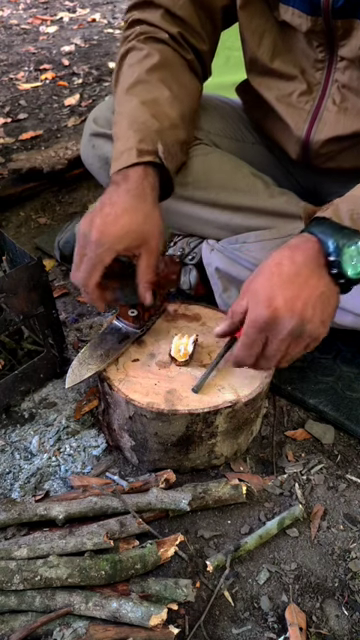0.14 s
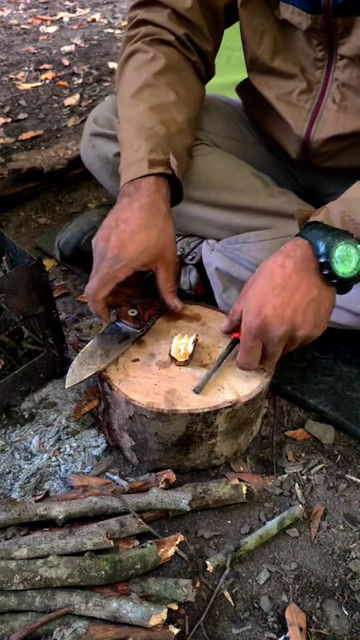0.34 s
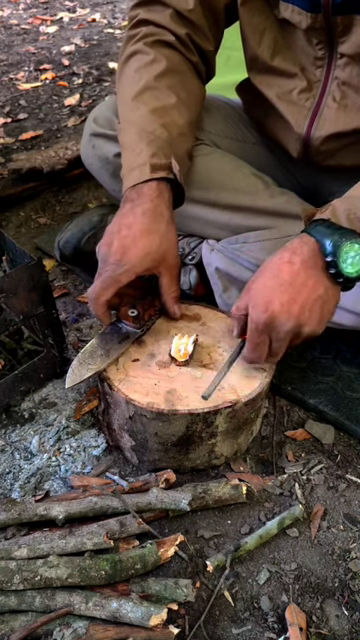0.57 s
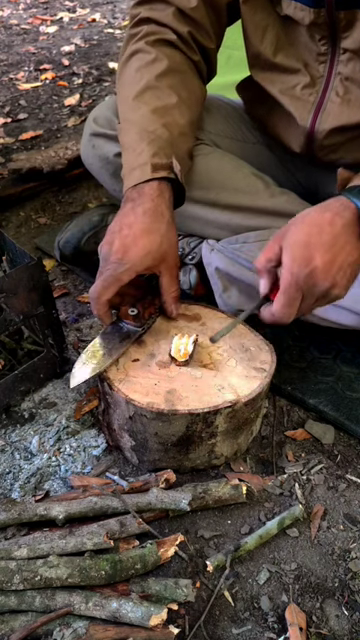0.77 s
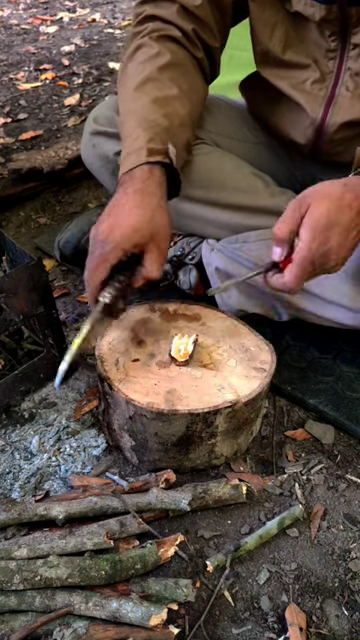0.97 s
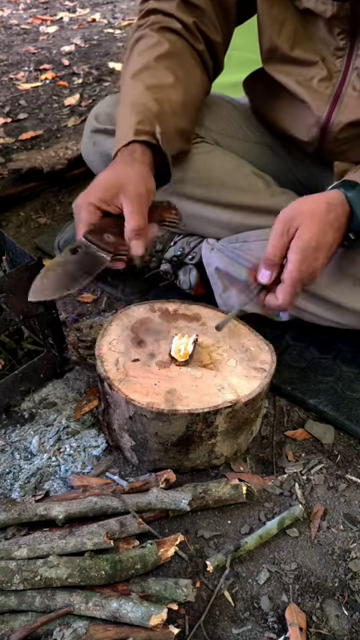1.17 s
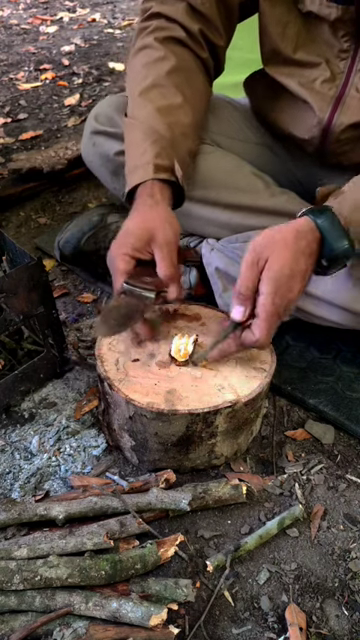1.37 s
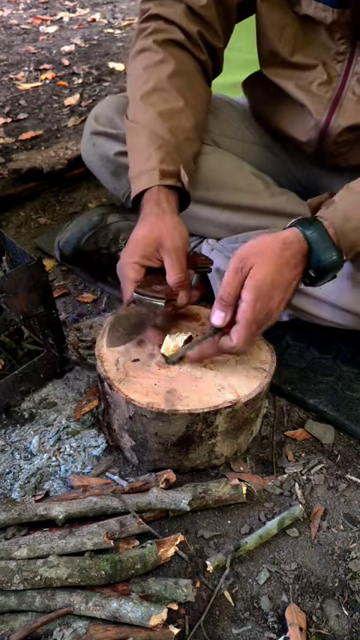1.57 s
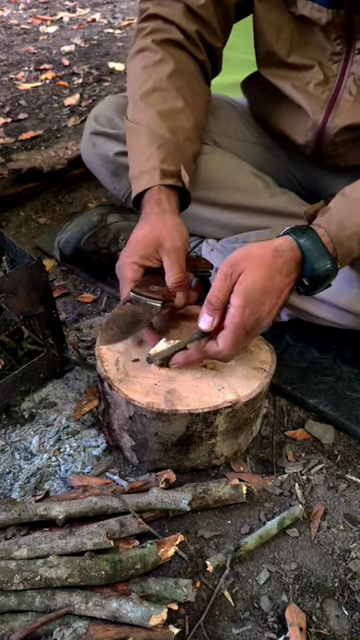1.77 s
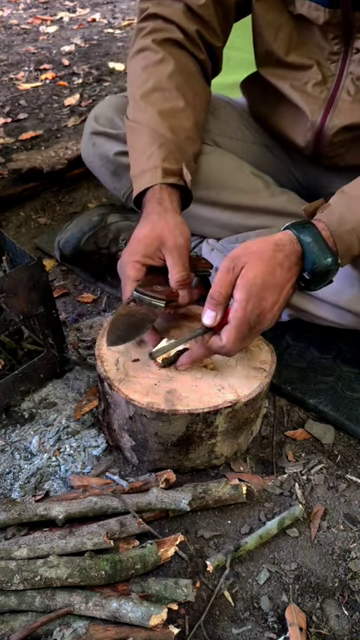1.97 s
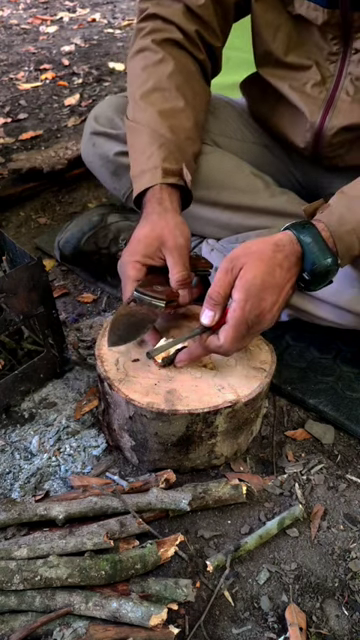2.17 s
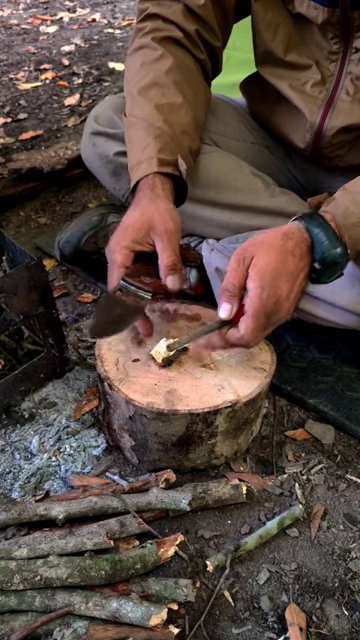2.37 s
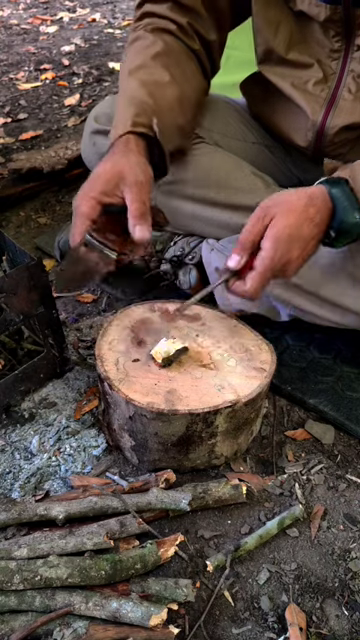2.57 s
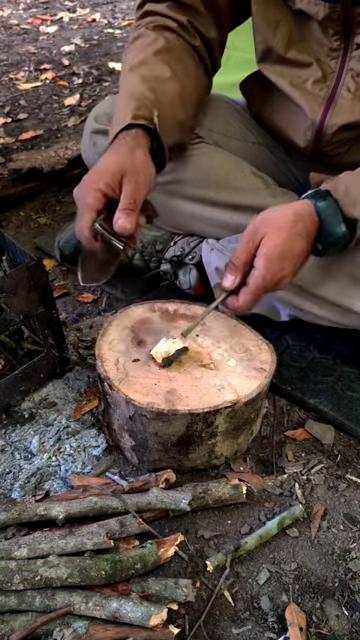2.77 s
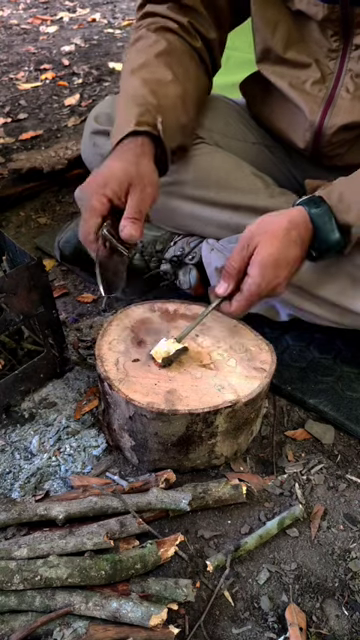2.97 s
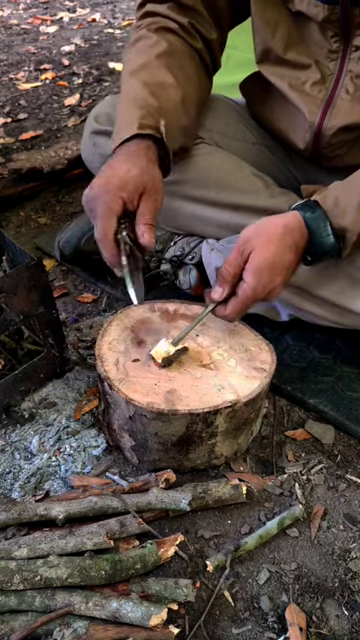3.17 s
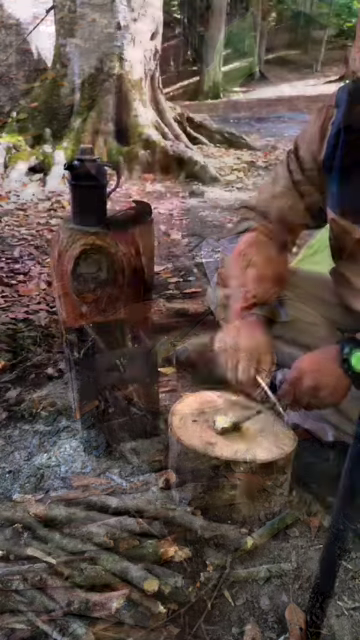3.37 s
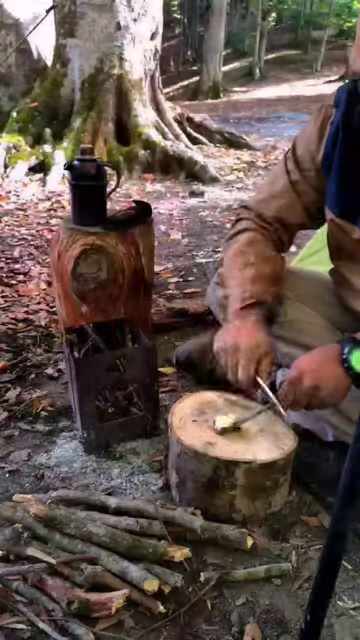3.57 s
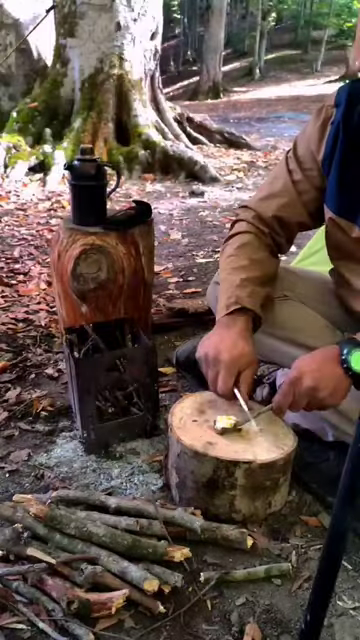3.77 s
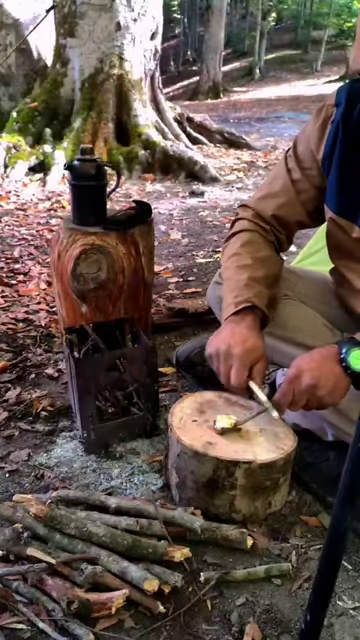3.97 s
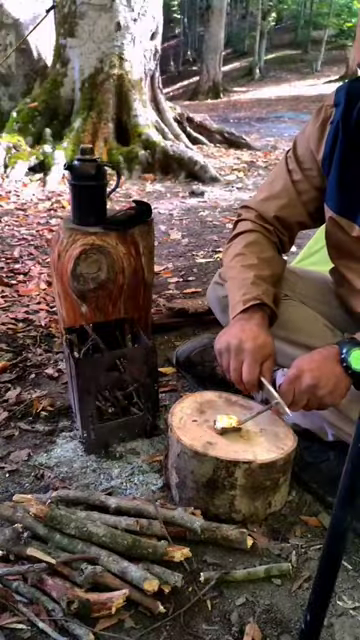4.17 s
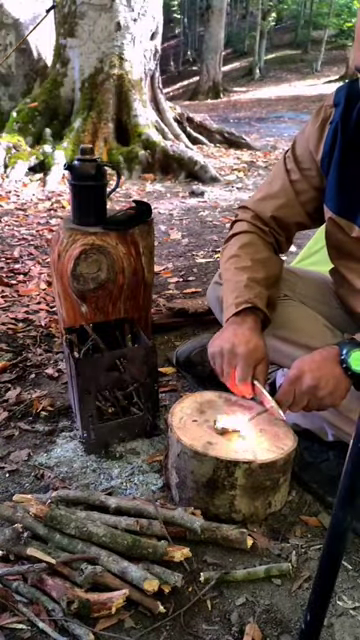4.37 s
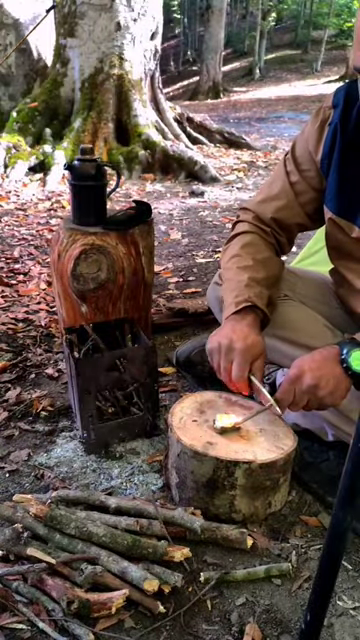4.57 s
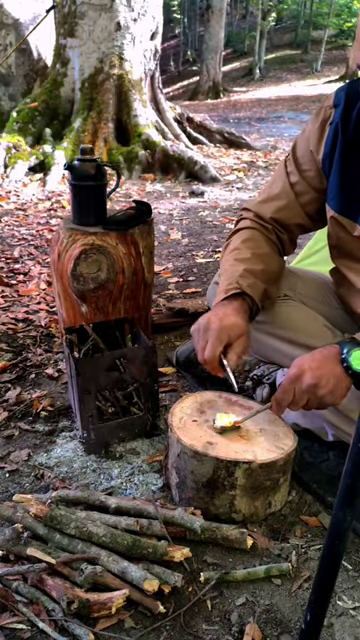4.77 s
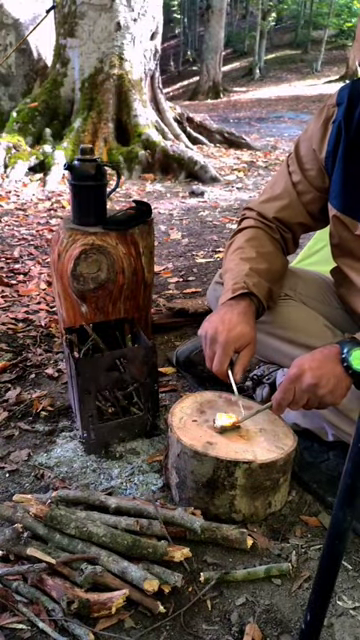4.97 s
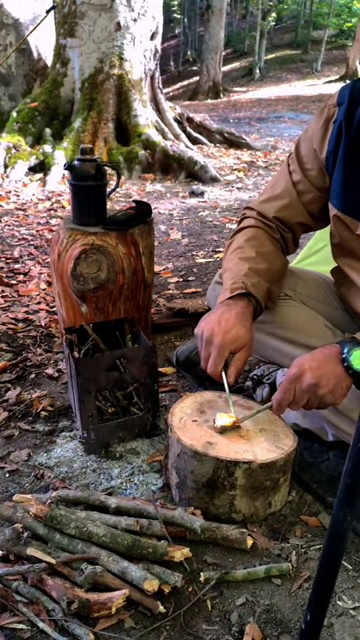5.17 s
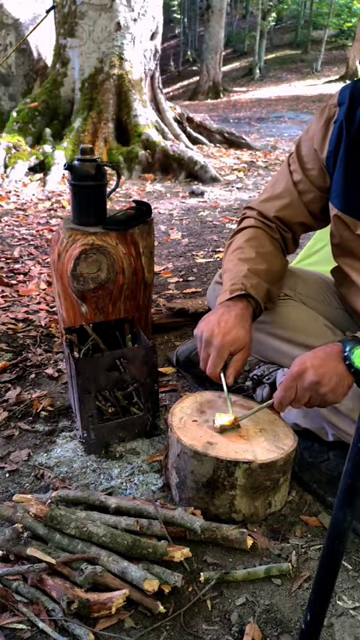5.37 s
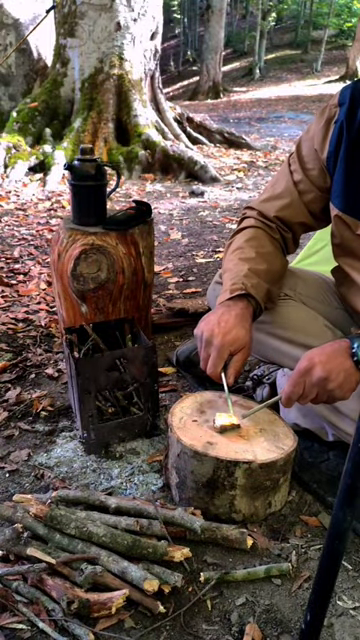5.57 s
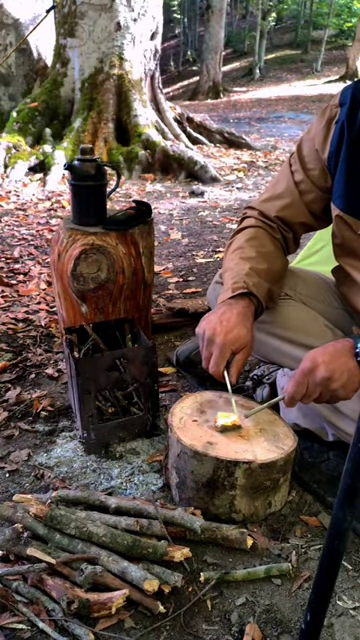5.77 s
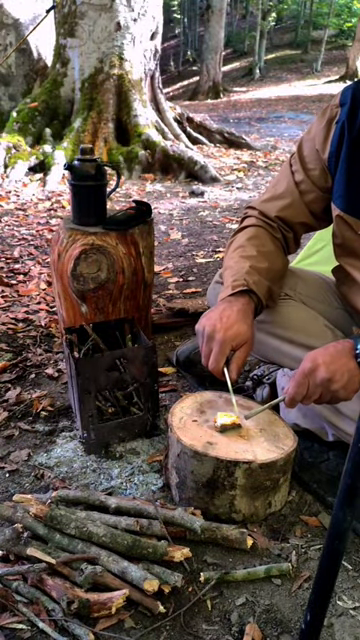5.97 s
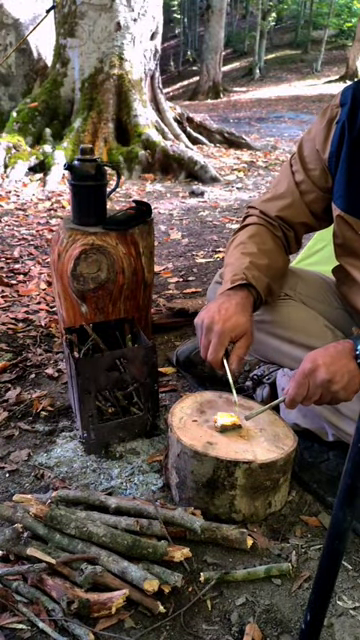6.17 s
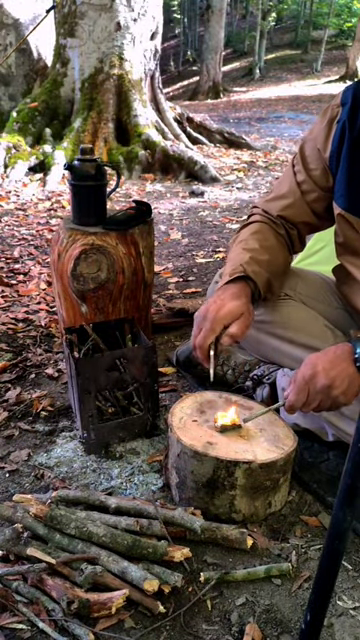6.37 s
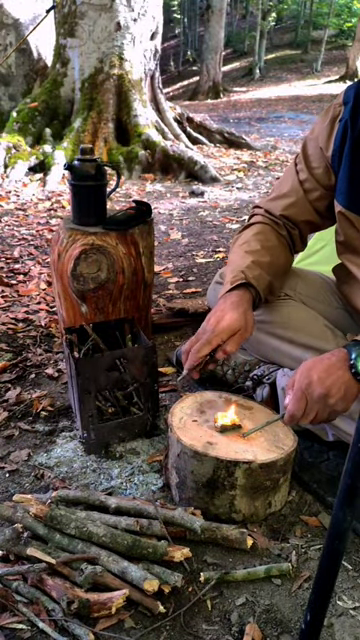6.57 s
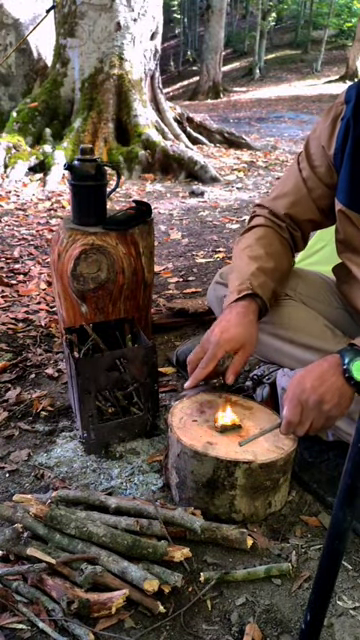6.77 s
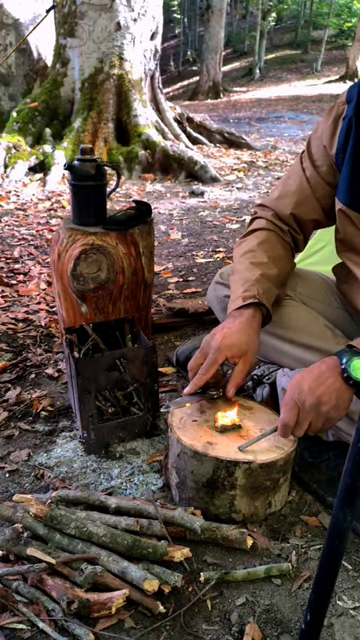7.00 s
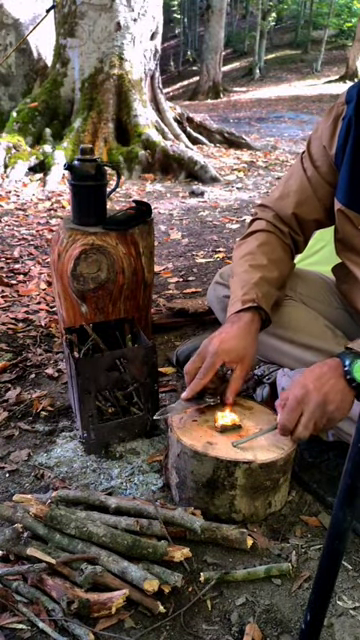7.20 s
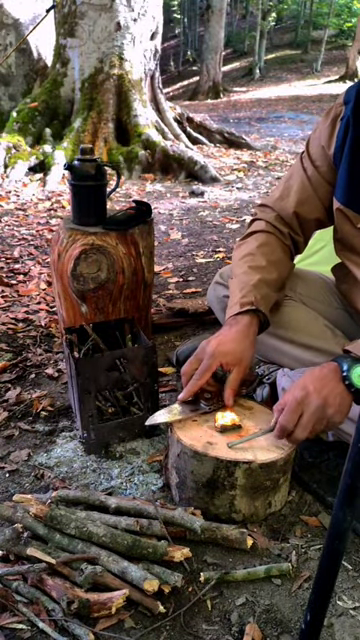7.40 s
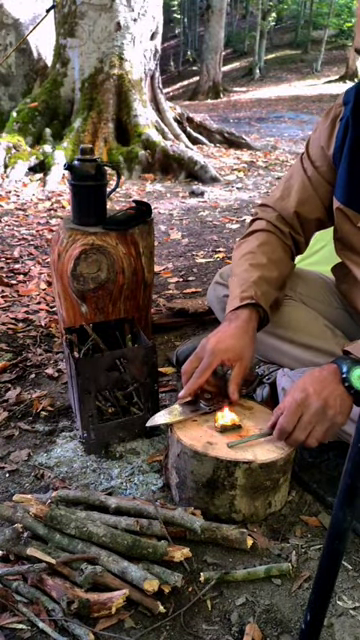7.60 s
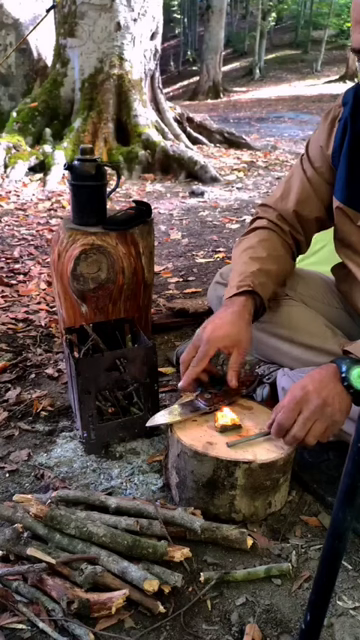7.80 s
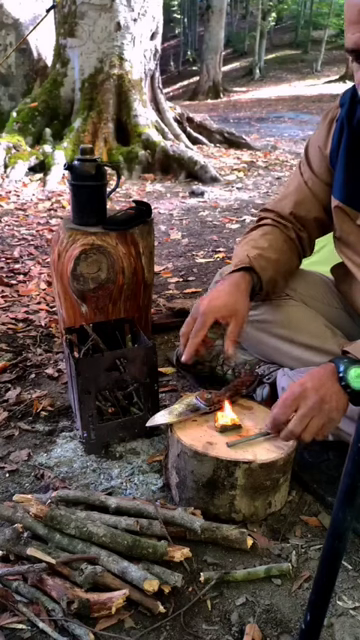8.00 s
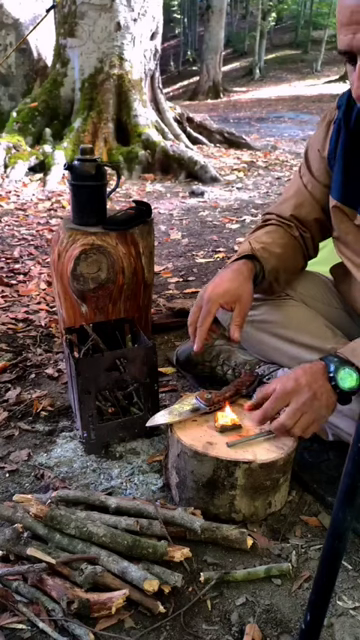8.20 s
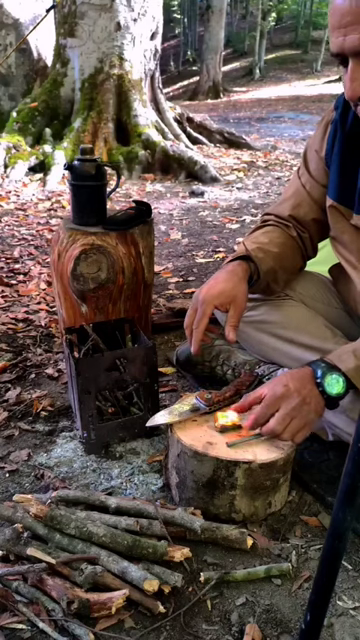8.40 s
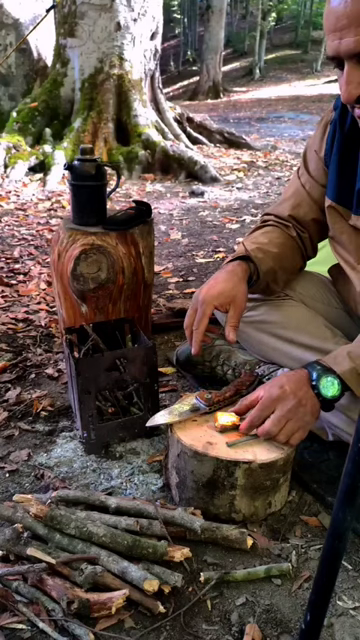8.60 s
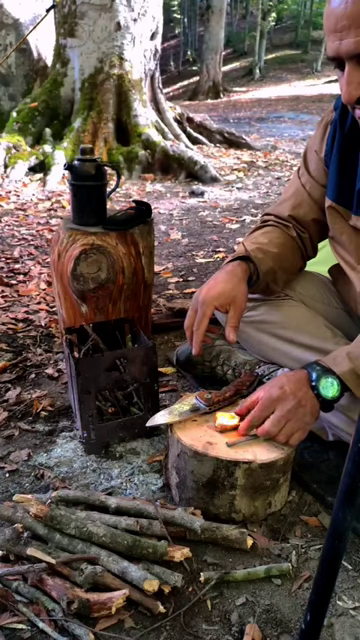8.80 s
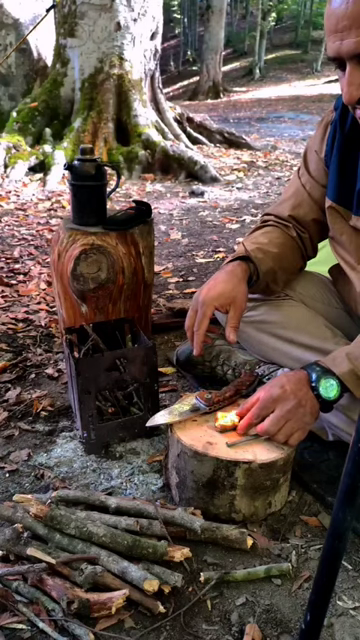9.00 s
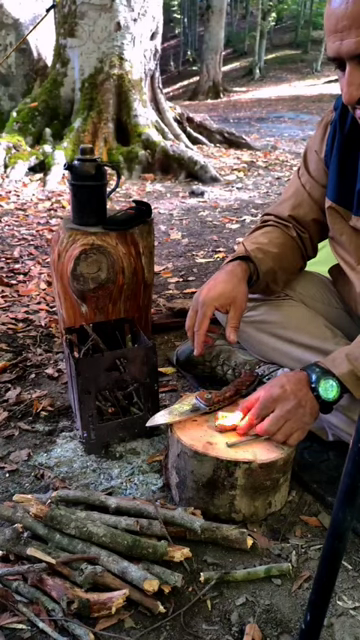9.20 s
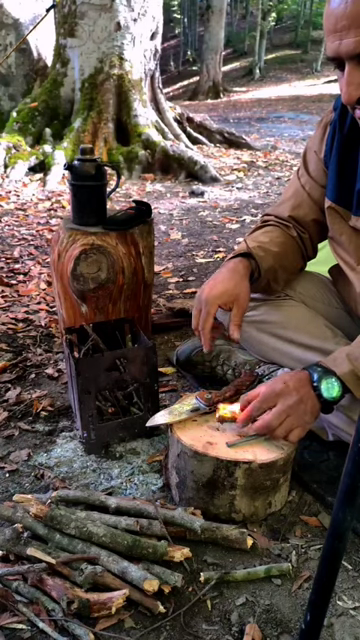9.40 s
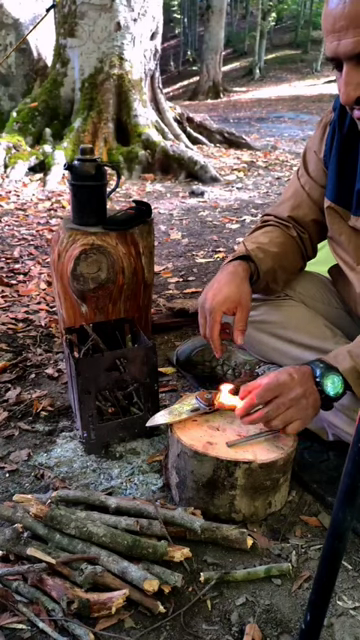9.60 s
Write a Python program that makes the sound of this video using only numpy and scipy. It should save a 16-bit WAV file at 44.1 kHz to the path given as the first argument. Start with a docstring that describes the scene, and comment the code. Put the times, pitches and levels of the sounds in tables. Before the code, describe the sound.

In an echoing wood, birdsong surrounds quiet handwork: sleeves rustling, a burst of harsh metallic scrapes with crackling sparks, then soft taps on a stump.

```python
"""A knife is scraped hard down a ferro rod over a stump, close to the microphone in a forest.
The edge rasps in noisy strokes that ring the blade, snags in sharp kicks, and throws sparks that sputter and pop.
Jacket sleeves swish as woven noise, tools tap on the wood, and clothes and boots rub low on the ground.
Small birds whistle from both sides in gliding tones among echoing trunks; far off are leaves, a hum and a hoot.
Light air rocks the microphone as low-frequency noise."""
import sys
import numpy as np
from scipy import signal
from scipy.fft import rfft, irfft, next_fast_len
from scipy.io import wavfile
from scipy.ndimage import map_coordinates

SR = 44100
rng = np.random.default_rng(int(sys.argv[2]) if len(sys.argv) > 2 else 0)


def transcribe(u):
    """Save the signal u as a 16-bit wav file named by the first command-line argument.

    u: samples, shape (n,) or (channels, n), limited to [-1, 1]; the rate is SR.
    q: integer samples, one column per channel.
    """
    v = np.clip(np.atleast_2d(u).T, -1, 1)
    q = np.round(v * 32767).astype(np.int16)
    wavfile.write(sys.argv[1], SR, q)


N = 425565  # length [samples]

# The microphone moves from above the stump to a breezier spot beside it
MOVE_S = 3.4
TOP_HZ = 14300  # the recorder's band limit

# Far hum: steady level until the microphone moves, and one swell (start [s], top [s], end [s])
HUM_DB, HUM_SWELL_DB, HUM_SWELL_S = -76.5, -68.5, (1.5, 1.98, 2.45)
# Far leaves, level: (time [s], level [dB])
LEAVES_LEVEL = [(0, -64), (1.5, -66), (2.4, -66), (2.8, -64), (4.6, -63), (5.2, -66), (6.4, -64),
                (7.3, -63), (8, -65), (9.65, -66)]
LEAVES_DRIFT_DB = 0.25
# Far leaves, relative spectrum: (frequency [Hz], density [dB per Hz])
LEAVES_SPECTRUM = [(18, -21), (30, -18), (38, -19.5), (84, -18.5), (118, -17), (214, -21), (263, -24),
                   (316, -21), (398, -25), (651, -28), (1180, -29), (1280, -29.5), (2770, -30.5),
                   (4190, -32), (14500, -38.5)]
# Far leaves, likeness of the two channels: (frequency [Hz], left-right correlation [0-1])
LEAVES_LIKENESS = [(60, 1), (900, 1), (2200, 1), (3500, 0.81), (6000, 0.39), (14000, 0.13)]
# Far hoot, sliding pitch: (time [s], frequency [Hz])
HOOT_PITCH = [(2.98, 410.6), (3.05, 449), (3.1, 527), (3.2, 530)]
# Air on the microphone, before its swings and trim: (time [s], level [dB])
BREEZE_LEVEL = [(0, -54), (2.8, -59.5), (3.4, -44.5), (4.45, -31.5), (4.75, -40.5), (5.05, -31), (5.6, -32),
                (6, -41), (6.3, -37), (6.55, -44), (7.2, -36), (7.55, -44), (7.8, -30.5), (8.2, -46.5),
                (9.65, -44)]
GUST_DB, GUSTS_PER_S = 3, 9  # size and rate of the random swings
# Air on the microphone, relative spectrum: (frequency [Hz], density [dB per Hz])
BREEZE_SPECTRUM = [(2, -1.5), (6, 6), (12, -16.5), (25, -35.5), (50, -34), (120, -43.5), (300, -74)]

# Bird songs, one for each perch: (left-right [dB], its notes: (time [s], length [s], start pitch [Hz],
# end pitch [Hz], level before the call's gains [dB], buzz [0-1]))
SONGS = [(11, [(.01, 0.24, 3700, 3710, -65, 0.39), (.403, 0.073, 3500, 3320, -60, 0.4),
         (.43, 0.33, 2940, 2880, -63, 0.19), (1.558, .11, 8320, 8030, -56, .15),
         (1.733, 0.1, 6060, 5990, -45.5, 0.55), (1.912, 0.081, 4250, 4010, -41, 0.3),
         (2.051, .098, 5370, 5770, -44, 0.14), (2.201, 0.07, 4160, 4197, -35.5, 0.05)]),
         (-13.5, [(5.799, .12, 4150, 5070, -61.5, 0.1), (6.044, .066, 3020, 3314, -57, 0.27),
         (6.2, 0.033, 4700, 5250, -56, 0.57), (6.238, 0.05, 4505, 3180, -53.5, .86),
         (6.827, .11, 8260, 7100, -57.5, .6), (6.935, .048, 6960, 4760, -49, 0.8),
         (7.022, 0.034, 4100, 3790, -45.5, 0.2), (7.06, 0.048, 4370, 4500, -52, 0.14),
         (7.11, 0.032, 3830, 3900, -52, .14), (7.193, 0.024, 3790, 3750, -45, .02),
         (7.251, 0.23, 4310, 4245, -55, 0.08), (8.536, 0.15, 9000, 8100, -66, 0.2),
         (8.75, 0.11, 7920, 7650, -62.5, 0.02)]), (-4, [(3.728, 0.043, 5150, 4960, -60, 0),
         (5.802, .19, 2750, 2750, -62, 0.15), (6.317, 0.115, 4830, 4680, -63.5, .2),
         (8.98, 0.099, 3110, 3300, -65, 0.78)])]
# Two-note trill syllables: (delay [s], length [s], start pitch [Hz], end pitch [Hz],
# level relative to the repeat [dB], buzz [0-1]); pitches vary a little at each repeat
RISING = [(0, .04, 3200, 4605, 0, .8), (.1, .04, 4850, 5200, -6, .4)]
HIGH_BUZZ = [(0, 0.0588, 7150, 7500, -0.5, 0.81), (0.045, .046, 6660, 5570, -8, .9)]
FALLING = [(0, 0.0342, 4170, 3470, 0.5, .25), (.024, 0.0465, 5240, 4760, -6.5, .62)]
# Trills, one syllable repeated: (left-right [dB], syllable, its repeats: (time [s], level before gains [dB]))
TRILLS = [(-8, RISING, [(4.69, -61.5), (4.887, -57.5), (5.101, -55.5), (5.295, -54.5), (5.506, -54.5)]),
          (-12, HIGH_BUZZ, [(7.662, -44.5), (7.777, -41.5), (7.927, -45), (8.084, -42.5)]),
          (-17, FALLING, [(7.985, -52), (8.226, -46.5), (8.388, -43.5), (8.552, -47)])]
REPEAT_SPREAD = 0.0152  # relative pitch spread of the repeated notes
GLIDE_EASE = 1.6  # a note slides fast at first, then settles on its end pitch
# Stray notes from deep in the wood; the spread is of log pitch, the level is before the call's gains
FAR_NOTES_PER_S, FAR_HZ, FAR_SPREAD = 1.5, 4300, .2
FAR_LENGTH_S, FAR_DB, FAR_BUZZ = .08, -70.5, .3
# Nearby leaves and branches that smear a call: (frequency [Hz], time to fall 60 dB [s])
CANOPY_DECAY = [(2000, 0.15), (8000, 0.19)]
# Trunks that echo a call; the tail is cut after about a second: (frequency [Hz], time to fall 60 dB [s])
TRUNK_DECAY = [(200, 0.54), (2000, 2.5), (4000, 0.9), (8000, 1.1), (14000, 0.55)]

# The sitter shifts his weight: (start [s], fastest [s], end [s], level [dB])
SHIFTS = [(3.3, 4.2, 5.1, -67.5), (6.796, 7.597, 8.28, -66)]
# Dull rub on the ground, relative spectrum: (frequency [Hz], density [dB per Hz])
GROUND_SPECTRUM = [(30, -8), (110, -1), (250, -8), (700, -17), (3000, -17), (14000, -33)]
# Arm movements: (start [s], fastest [s], end [s], swish before folds and brightening [dB])
ARM_MOVES = [(-.1, 0.24, 0.42, -63), (0.667, 0.972, 1.2, -49.5), (1.04, 1.212, 1.44, -57.5),
             (1.307, 1.391, 1.51, -52), (1.38, 1.48, 1.606, -50.5), (1.485, 1.873, 1.957, -56.5),
             (2.415, 2.62, 3.1, -58), (7.908, 8.31, 8.8, -55)]
# The jacket heard from above, then beside the stump, relative spectra: (frequency [Hz], density [dB per Hz])
CLOTH_SPECTRA = [
    [(120, -22), (200, -10), (231, -9), (319, -5.5), (440, -9.5), (619, -9.5), (809, -8), (918, -1.5),
     (1630, -4.5), (2640, -1.5), (3400, -7.5), (7880, -13.5), (13700, -27.5), (14500, -30)],
    [(120, -33.5), (200, -8), (297, -7), (425, -9), (795, -2), (3520, 1), (6360, -9.5), (7610, -9.5),
     (14500, -19.5)],
]
SWISH_POWER, FOLDS_DB = 0.95, 1.5  # the swish grows with arm speed to this power; folds make it uneven
SWISH_TREBLE_HZ, SWISH_BRIGHTEN = 3300, 0.14  # a faster arm brings out the treble above this, to this power

# Tools touch the stump: (time [s], click peak [dB], thud peak relative to the click [dB])
TAPS = [(1.0224, -45, -6), (1.0997, -40, -9), (3.3595, -44.5, -13), (6.96, -55, 5.5), (7.505, -56, -1),
        (7.615, -36.5, -21), (7.661, -57, 4), (9.349, -51, -18)]
# Resonances of the tapping tool: (frequency [Hz], width [Hz], gain [dB])
TOOL_MODES = [(1140, 280, 9.5), (2750, 480, 20), (3380, 450, -18), (5800, 700, -17), (9800, 2000, -26)]
# Resonances of the stump: (frequency [Hz], width [Hz], gain [dB])
STUMP_MODES = [(170, 92, -4.5), (327.4, 240, -4), (684, 430, 5.5)]
# Showers of burning metal: (peak time [s], level [dB], rise over 20 dB [s], fall over 20 dB [s])
SHOWERS = [(3.852, -36, 0.044, 0.044), (4.135, -36, 0.045, 0.026), (4.163, -36.5, 0.027, .025),
           (4.202, -35.5, 0.012, 0.025), (4.24, -45, 0.012, 0.051), (4.355, -45.5, 0.032, 0.025),
           (4.384, -37, 0.019, 0.033), (4.447, -36.5, 0.04, 0.041), (4.505, -42, 0.035, 0.052),
           (5.659, -52.5, 0.017, 0.036)]
# Sputter of the showers, relative spectrum: (frequency [Hz], density [dB per Hz])
SPARK_SPECTRUM = [(47, -32.5), (80, -9), (195, -2), (271, -4.5), (322, 0), (446, -9), (675, -3), (803, -16),
                  (857, -9.5), (935, -12), (1920, -4.5), (3030, -8.5), (3850, -6.5), (8600, -17),
                  (14500, -24)]
# Single sparks burst: (time [s], peak [dB])
POPS = [(4.1681, -23), (4.1916, -17.5), (4.2366, -26.5), (4.2785, -33), (4.3008, -34.5), (4.3307, -28),
        (4.3706, -25.5), (4.3782, -20.5), (4.383, -18.5), (4.3927, -18.5), (4.407, -25), (4.436, -21),
        (4.4422, -20), (4.457, -19), (4.494, -27), (5.6534, -32), (5.66, -30)]
# A burst between hands and stump: (frequency [Hz], width [Hz], gain [dB])
POP_MODES = [(297, 380, 4.5), (1590, 1700, 7.5), (3530, 3600, 3), (7500, 1900, -41)]
# Strokes along the rod: (peak time [s], level before the treble tilt [dB], rise over 20 dB [s],
# fall over 20 dB [s], treble against body [dB])
STROKES = [(3.834, -27, 0.019, 0.028, 4.5), (3.857, -31, 0.023, 0.033, 1.5), (3.949, -49, 0.065, 0.14, 4),
           (4.016, -39, 0.047, 0.05, 4.5), (4.096, -38.5, 0.012, 0.056, 0.5),
           (4.123, -26.5, 0.028, 0.053, 3), (4.2, -44, 0.023, 0.035, 1), (4.52, -44, 0.023, 0.04, 6),
           (4.605, -54, 0.017, 0.048, 3), (5.66, -52, 0.023, 0.076, 3.5)]
# The edge catches and lets go: (time [s], peak [dB], treble gain before scaling to the peak [dB])
SNAGS = [(3.808, -18.5, 29), (3.8242, -10, 1.5), (3.829, -11.5, 0), (3.838, -11.5, -2), (3.856, -23, 1.5),
         (3.8622, -20, -4), (4.093, -31, 7), (4.118, -17, -8), (4.1304, -21, 5), (4.3297, -29.5, 0),
         (4.542, -33.5, 6)]
# Resonances of knife and rod, varied by each stroke and widened by a snag: (frequency [Hz], width [Hz], gain [dB])
BLADE_MODES = [(1760, 330, -11), (1900, 130, 0), (2058, 55, 1.5), (2564, 180, -4.5), (2880, 69, -3),
               (3150, 180, -5), (4100, 200, -11), (5240, 850, -10), (7010, 290, -7), (8000, 270, -14),
               (8730, 100, -3.5), (9170, 86, -6.5), (10300, 120, -23), (12640, 1250, -20)]
# The force of tearing chips: (frequency [Hz], gain [dB])
CHIP_FORCE = [(500, -37), (1100, -29), (1500, -6), (1900, 0.5), (5000, -1.5), (10000, 1.5), (11200, -2),
              (14500, -9)]
# Side signal of the close sounds: (frequency [Hz], gain [dB])
SIDE_SPECTRUM = [(100, -47), (1200, -49.5), (2500, -61), (4500, -17), (9000, -5), (14000, -3.5)]


def amp(db):
    """Decibels to gain."""
    return 10 ** (np.asarray(db) / 20)


def unit(x):
    """Scale to rms 1."""
    return x / np.sqrt(np.mean(x ** 2) + 1e-20)


def peaked(x):
    """Scale to peak 1."""
    return x / np.abs(x).max()


def along(points, hz):
    """Read (frequency [Hz], value) points on a log frequency axis."""
    f, v = np.transpose(points)
    return np.interp(np.log(hz + 1), np.log(f + 1), v)


def curves(rows):
    """One value per sample for each column after the time."""
    s, *cols = np.transpose(rows)
    return [np.interp(np.arange(N) / SR, s, c) for c in cols]


def wobble(rate, size=N):
    """A smooth random curve, rate knots a second."""
    knots = rng.standard_normal(int(size * rate / SR) + 4)
    return map_coordinates(knots, [np.arange(size) * rate / SR])


def filtered(x, response):
    """Multiply the spectrum of x by a response of frequency."""
    n = x.shape[-1]
    m = next_fast_len(n + 8192)  # room for the ringing
    return irfft(rfft(x, m) * response(np.fft.rfftfreq(m, 1 / SR)), m)[..., :n]


def coloured(x, spectrum):
    """Shape x by a (frequency [Hz], gain [dB]) spectrum."""
    return filtered(x, lambda hz: amp(along(spectrum, hz)))


def ring(x, modes):
    """Drive the resonances of a body with x."""
    def response(f):
        return sum(amp(db) * 1j * f * w / (c * c - f * f + 1j * f * w) for c, w, db in modes)
    return filtered(x, response)


def split(x, hz):
    """The parts of x below and above a frequency."""
    return [signal.sosfilt(signal.butter(3, hz, kind, fs=SR, output='sos'), x) for kind in ('low', 'high')]


def add(track, s, x):
    """Mix x into the track at time s."""
    part = track[..., round(s * SR):][..., :x.shape[-1]]
    part += x[..., :part.shape[-1]]


def swell(s, rise, fall, size=N):
    """A peak at s that is 20 dB down a rise earlier and a fall later."""
    t = np.arange(size) / SR - s
    return amp(-20 * np.minimum(np.maximum(-t / rise, t / fall), 4) ** 1.58)


def arc(start, top, end):
    """A smooth rise from rest to 1 and back, like the speed of a hand."""
    return np.sin(np.pi / 2 * np.interp(np.arange(N) / SR, [start, top, end], [0, 1, 0]))


def grains(rate, spread_db, size=N):
    """Random impulses, rate a second, of uneven size and either sign, at rms 1."""
    hits = rng.random(size) < rate / SR
    signs = rng.choice([-1, 1], size)
    sizes = amp(spread_db * rng.standard_normal(size).clip(-2, 2))
    return unit(hits * signs * sizes)


def echo(x, decay):
    """Sound scattered back in a noise tail that dies at its own speed in each band."""
    hz, t, z = signal.stft(rng.standard_normal((2, SR)), SR, nperseg=256)
    fade = amp(-60 * t / along(decay, hz)[:, None])
    tail = signal.istft(z * fade, SR, nperseg=256)[1]
    return signal.fftconvolve(x, tail / np.linalg.norm(tail[0]), axes=1)[:, :N]


def near(source):
    """Two draws of a source: a shared middle, and a side signal very weak in the bass, stronger in the treble."""
    mid, side = source(), coloured(source(), SIDE_SPECTRUM)
    return np.array([mid + side, mid - side])


def hum():
    """A far hum is noise through two low, overlapping resonances."""
    steady = amp(HUM_DB) * (np.arange(N) / SR < MOVE_S)
    level = steady + amp(HUM_SWELL_DB) * arc(*HUM_SWELL_S)
    narrow = ring(rng.standard_normal(N), [(137.6, 21, 0)])
    return level * unit(ring(narrow, [(131, 40, 0)]))


def leaves():
    """Far leaves are a wide wash of noise whose channels grow less alike in the treble."""
    def mid_side(hz):
        turn = np.arccos(np.clip(along(LEAVES_LIKENESS, hz), -1, 1)) / 2
        return amp(along(LEAVES_SPECTRUM, hz)) * [np.cos(turn), np.sin(turn)]
    mid, side = filtered(rng.standard_normal((2, N)), mid_side)
    level = amp(curves(LEAVES_LEVEL)[0] + LEAVES_DRIFT_DB * wobble(5))
    return level * unit(np.array([mid + side, mid - side]))


def hoot():
    """One faint far hoot is a pure tone that slides upward."""
    hz = curves(HOOT_PITCH)[0]
    return amp(-62.5) * swell(3.08, 0.11, 0.18) * np.sin(2 * np.pi * np.cumsum(hz) / SR)


def breeze():
    """Light air rocks the microphone: gusting low noise, the same in both channels."""
    level_db = curves(BREEZE_LEVEL)[0] + GUST_DB * wobble(GUSTS_PER_S)
    return amp(level_db - 5.5) * unit(coloured(rng.standard_normal(N), BREEZE_SPECTRUM))


def forest():
    """The far forest and the air at the microphone."""
    return leaves() + breeze() + hum() + hoot()


def bird_notes():
    """Every song, trill and stray note: (time, length, start pitch, end pitch, level, buzz, left-right)."""
    notes = [(*note, pan) for pan, song in SONGS for note in song]
    for pan, syllable, repeats in TRILLS:
        for s, db in repeats:
            for delay, length, start, end, level, buzz in syllable:
                pitch = 1 + REPEAT_SPREAD * rng.normal()
                notes.append((s + delay, length, start * pitch, end * pitch, db + level, buzz, pan))
    for s in rng.uniform(0, N / SR, int(FAR_NOTES_PER_S * N / SR)):
        pitch, slide, side = rng.standard_normal(3)
        hz = FAR_HZ * np.exp(FAR_SPREAD * pitch)
        notes.append((s, FAR_LENGTH_S, hz, hz * np.exp(.07 * slide), FAR_DB, FAR_BUZZ, 8 * side))
    return notes


def birds():
    """Each note is a gliding whistle; a fast flutter makes it buzzy, and canopy and trunks scatter it."""
    direct, scattered = np.zeros((2, 2, N))
    for s, length, start, end, db, buzz, pan in bird_notes():
        u = np.linspace(0, 1, int(length * SR))
        glide = end + (start - end) * (1 - u) ** GLIDE_EASE
        pitch = glide + 380 * buzz * wobble(602, size=SR // 2)[:len(u)]
        flutter = amp(4.1 * buzz * wobble(127, size=SR // 2)[:len(u)])  # buzzy notes also break up in level
        envelope = np.abs(np.sin(np.pi * u)) ** 0.33
        note = unit(np.sin(2 * np.pi * np.cumsum(pitch) / SR) * flutter * envelope)
        far = -amp(-abs(pan))  # the far channel is weaker and inverted
        sides = [1, far] if pan > 0 else [far, 1]
        call = amp(db - 1.5) * np.outer(sides, note)
        add(direct, s, amp(2 - 7.0 * buzz) * call)
        add(scattered, s, buzz * call)
    trunks = amp(-6.5) * echo(direct + 1.04 * scattered, TRUNK_DECAY)
    return direct + echo(scattered, CANOPY_DECAY) + trunks


def legs():
    """Trousers and boots rub dully on the ground: sparse grains and noise that follow the body's speed."""
    rub = unit(coloured(grains(rate=180, spread_db=0) + 0.76 * rng.standard_normal(N), GROUND_SPECTRUM))
    return rub * sum(amp(db) * arc(start, top, end) for start, top, end, db in SHIFTS)


def weave():
    """Threads sliding over each other: dense grains and noise, coloured by where the microphone stands."""
    threads = grains(rate=7000, spread_db=1.5) + 0.69 * rng.standard_normal(N)
    parts = np.split(threads, [round(MOVE_S * SR)])
    return np.concatenate([unit(coloured(part, cloth)) for part, cloth in zip(parts, CLOTH_SPECTRA)])


def sleeves():
    """The jacket gives a fine, dense swish that follows the arm's speed."""
    body, treble = split(near(weave), SWISH_TREBLE_HZ)
    moves = [amp(db) * arc(start, top, end) ** SWISH_POWER for start, top, end, db in ARM_MOVES]
    swish = np.linalg.norm(moves, axis=0)  # overlapping moves add in power
    folds = amp(FOLDS_DB * wobble(25))
    return swish * folds * (body + treble * peaked(swish) ** SWISH_BRIGHTEN)


def taps():
    """A tool clicks on the stump, which answers with a dead thud."""
    out, t = np.zeros(N), np.arange(SR // 10) / SR
    for s, db, thud_db in TAPS:
        contact = amp(-60 * t / 0.013) + 0.065 * amp(-60 * t / 0.093)
        click = ring(rng.standard_normal(len(t)) * contact, TOOL_MODES)
        thud = ring(rng.standard_normal(len(t)) * amp(-60 * t / 0.076), STUMP_MODES)
        add(out, s, amp(db) * (peaked(click) + amp(thud_db) * peaked(thud)))
    return out


def sparks():
    """Chips burn with a dry sputter of grains and noise; the largest burst with a pop."""
    out = np.zeros(N)
    for s, db, rise, fall in SHOWERS:
        add(out, s - .5, amp(db) * swell(.5, rise, fall, size=SR))
    out *= unit(coloured(grains(rate=1800, spread_db=5.5) + 0.71 * rng.standard_normal(N), SPARK_SPECTRUM))
    t = np.arange(SR // 50) / SR
    for s, db in POPS:
        scatter = 0.14 * rng.standard_normal(len(t)) * amp(-60 * t / 0.03)  # off hands and stump
        burst = (t == 0) + scatter
        pop = split(ring(burst, POP_MODES), 7700)[0]
        add(out, s, amp(db) * peaked(pop))
    return out


def strokes():
    """The edge tears chips off the rod; the chattering friction rings the blade and drives the stump."""
    out = np.zeros(N)
    for s, db, rise, fall, bright in STROKES:
        chatter = amp(1.24 * wobble(350, size=SR) + 1.2 * wobble(89.87, size=SR))
        friction = (grains(rate=2500, spread_db=5.5, size=SR) + 0.68 * rng.standard_normal(SR)) * chatter
        # grip and contact point differ from stroke to stroke, and so does the ring
        modes = [(hz * (1 + 0.006 * rng.normal()), width, level + 2.9 * rng.normal())
                 for hz, width, level in BLADE_MODES]
        scrape = unit(coloured(ring(friction, modes) + 0.051 * friction, CHIP_FORCE))
        body, treble = split(scrape, 3680)
        wood = amp(-19) * unit(ring(ring(friction, STUMP_MODES), STUMP_MODES))  # driven by the rod's tip
        level = amp(db - bright / 2) * swell(0.4991, rise, fall, size=SR)
        add(out, s - .5, level * (wood + body + amp(bright) * treble))
    return out


def snags():
    """The edge catches and lets go: a very short slip kicks the blade hard."""
    out, t = np.zeros(N), np.arange(SR // 20) / SR
    damped = [(hz, width + 250, db) for hz, width, db in BLADE_MODES]  # an edge that digs in damps the blade
    for s, db, bright in SNAGS:
        slip = rng.standard_normal(len(t)) * t ** 2 * np.exp(-t / 0.00071)
        body, treble = split(coloured(ring(slip, damped), CHIP_FORCE), 3930)
        kick = body + amp(bright) * split(treble, 7300)[0]
        add(out, s, amp(db) * peaked(kick))
    return out


def rasp():
    """The knife on the rod: strokes that rasp and snags that kick."""
    return strokes() + snags()


def scene():
    """Close, dry handwork before distant birds."""
    work = near(rasp) + near(sparks) + near(taps) + sleeves() + legs()
    return work + birds() + forest()


def record(dry):
    """The recorder keeps next to nothing above its band limit."""
    return filtered(dry, lambda hz: 1 / (1 + (hz / TOP_HZ) ** 200))


dry = scene()
out = record(dry)
transcribe(out)
```